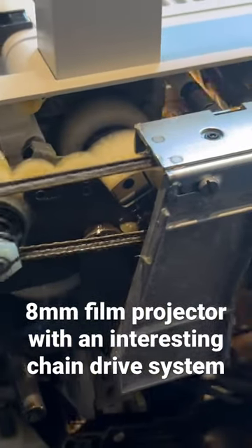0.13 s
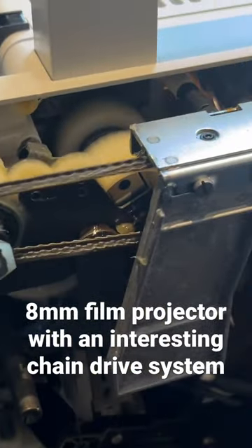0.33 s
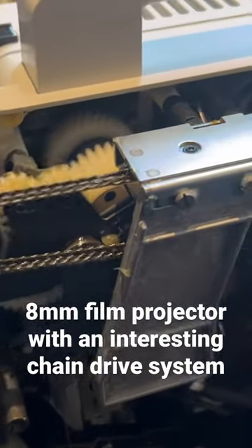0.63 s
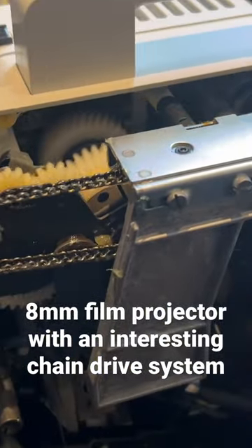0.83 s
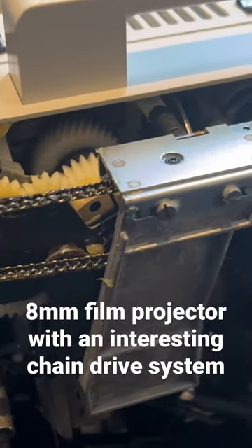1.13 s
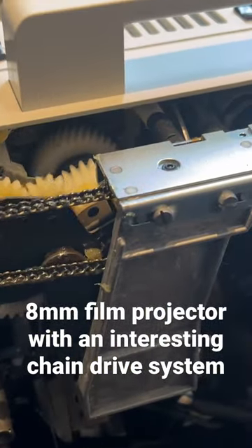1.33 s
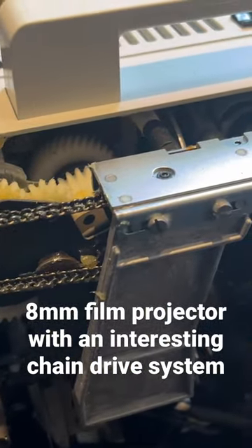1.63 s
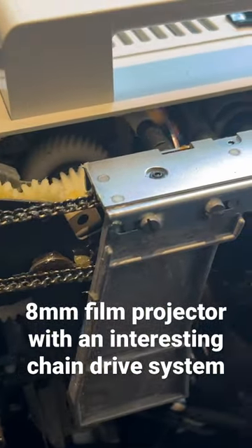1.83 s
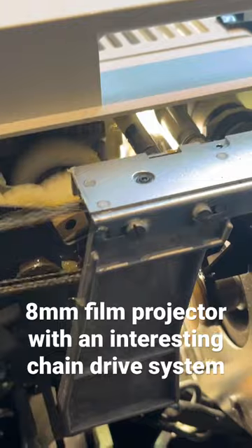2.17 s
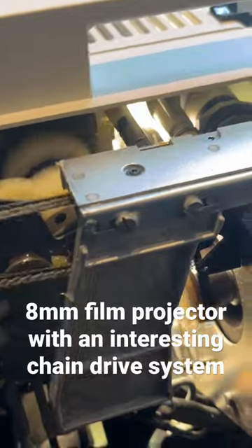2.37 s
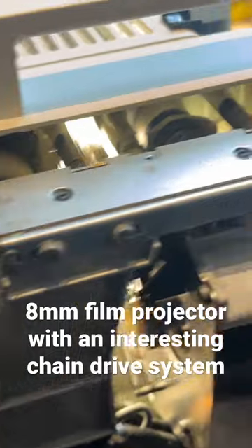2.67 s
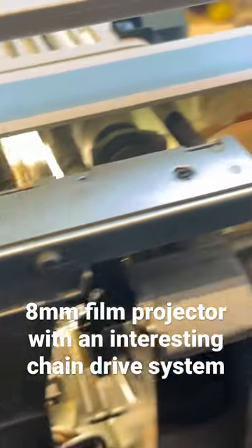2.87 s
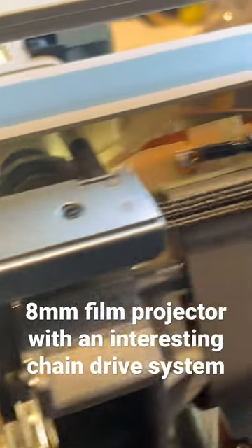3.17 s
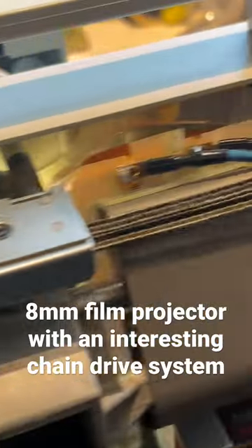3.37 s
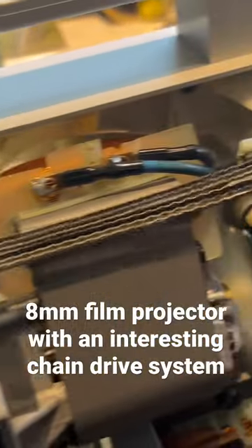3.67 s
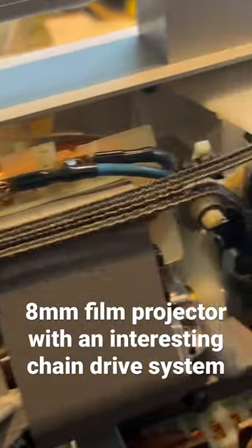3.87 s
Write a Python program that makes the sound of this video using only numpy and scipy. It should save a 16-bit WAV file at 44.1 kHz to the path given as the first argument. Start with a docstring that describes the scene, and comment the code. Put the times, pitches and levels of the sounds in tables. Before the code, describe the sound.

Close stereo microphone on a projector's chain drive indoors: brief fast whir, loud clack, slowing ticks, quiet pause with two duller clacks, then a crisp switch snap and steady whirring chatter to the end.

```python
"""A quiet room, heard close to a small film projector: its motor is switched off and coasts down,
a lever is clacked through its stops, and the motor starts again.
Sines locked to the shaft or the mains give frame shake, gear whine and hum; random impulses and
noise give the whir and chatter of the chain drive. The claw's strokes ring a spring plate, and
bursts of noise crack and ring the casing. Faint room air and a short reverberation surround it."""
import sys
import numpy as np
from scipy import signal
from scipy.fft import rfft, irfft
from scipy.io import wavfile

SR = 44100
rng = np.random.default_rng(int(sys.argv[2]) if len(sys.argv) > 2 else 0)


def transcribe(signal):
    """Save signal, clipped to [-1, 1], as a 16-bit WAV file at the path in sys.argv[1]."""
    frames = np.atleast_2d(signal).T
    limited = np.clip(frames, -1, 1)
    pcm = np.round(limited * 32767).astype(np.int16)
    wavfile.write(sys.argv[1], SR, pcm)


N = 176400
T = np.arange(N) / SR  # time in s

CAM_HZ = 17.72  # cam turns per second at full speed
# Spectrum of a hard contact. Each row: frequency in Hz, gain in dB.
CRACK_TONE = [(300, -8.5), (1500, 11.5), (3300, 7), (6300, 5.5), (11500, 2), (16000, -10.5)]


def amp(db):
    """Decibels are a logarithmic measure of amplitude: 20 dB is a factor of ten."""
    return 10 ** (np.asarray(db) / 20)


def evened(x):
    """Root-mean-square normalization gives a signal unit mean power."""
    return x / np.sqrt(np.mean(x ** 2) + 1e-20)


def read(points, hz):
    """Interpolation along a logarithmic frequency axis follows musical intervals."""
    f, value = np.transpose(points)
    return np.interp(np.log(hz + 1), np.log(f + 1), value)


def curve(points):
    """An envelope is a piecewise linear function of time."""
    return np.interp(T, *np.transpose(points))


def add(mix, s, sound):
    """Superposition: a sound is summed into the mix from time s, cut at the mix's ends."""
    i = round(s * SR)
    part = mix[max(i, 0):][:len(sound) + min(i, 0)]
    part += sound[max(-i, 0):][:len(part)]


def colour(x, points):
    """A minimum-phase filter: the Hilbert transform of log gain gives the phase of a causal response."""
    log_gain = read(points, np.fft.rfftfreq(8192, 1 / SR)) * np.log(10) / 20
    mirrored = np.r_[log_gain, log_gain[-2:0:-1]]
    response = np.exp(signal.hilbert(mirrored).conj())
    taps = np.fft.ifft(response).real[:4096]
    return signal.fftconvolve(x, taps)[:len(x)]


def slow(top_hz):
    """Sines of random phase, weaker towards high rates, sum to a slow fluctuation of rms 1."""
    rates = np.geomspace(top_hz / 20, top_hz, 16)
    phases = rng.random(16)
    coarse_t = T[::64]
    waves = np.sin(2 * np.pi * (rates * coarse_t[:, None] + phases)) / np.sqrt(rates)
    return np.interp(T, coarse_t, evened(waves.sum(1)))


def air():
    """Room air is broadband noise, partly coherent between the two channels."""
    # Each row: frequency in Hz, spectral level in dB per Hz.
    air_tone = [(60, 1), (2400, -12.5), (5000, -21.5), (16000, -65.5)]
    level_db = -59
    shared, left, right = rng.standard_normal((3, N))
    pair = [colour(shared + .5 * own, air_tone) for own in (left, right)]
    return amp(level_db) * evened(np.array(pair))


def tones(turns, speed):
    """Forced vibration: frame shake and gear whine follow the shaft, hum follows the mains."""
    # Frame shake. Each row: multiple of the cam rate, level at full speed in dB rms.
    orders = [(3, -53.5), (7, -52), (8, -47), (9, -53), (26, -59), (30, -55.5)]
    # Hum. Each row: multiple of the mains hum, steady level at full speed in dB rms.
    hum_lines = [(1, -48), (2, -49.5), (3, -53.5)]
    mains_hz, gear_hz = 100., 771.4  # gear whine at full speed
    gear_db, waver_db = -49, 1.5  # gear at full speed; rms waver of every line
    speed_power = 5.8  # amplitude of shake and whine against speed
    off_s, on_s, ramp_s = .236, 1.803, 0.03
    start_db, start_s = 4.5, 0.14  # surge of the first hum line about the start

    def line(cycles, db):
        wavering = amp(db + waver_db * slow(25))
        return np.sqrt(2) * wavering * np.sin(2 * np.pi * (cycles + rng.random()))

    driven = sum(line(k * turns, db) for k, db in orders)
    driven += line(turns * gear_hz / CAM_HZ, gear_db)
    before_off = np.clip((off_s - T) / ramp_s, 0, 1)
    after_on = np.clip((T - on_s) / ramp_s, 0, 1)
    strain = amp(start_db * np.exp(-abs(T - on_s) / start_s))
    hum = line(mains_hz * T, hum_lines[0][1]) * strain
    hum += speed * sum(line(k * mains_hz * T, db) for k, db in hum_lines[1:])
    return driven * speed ** speed_power + (before_off + after_on) * hum


def whir(turns):
    """Random impulses of the links add in power to air and bearing hiss, swelling once per cam turn."""
    # Each row: time in seconds, level in dB.
    whir_level = [(.2, -38), (.4, -46.5), (.7, -62.5), (1.79, -100), (1.84, -48.5), (1.92, -47.5),
                  (1.97, -41), (4, -40)]
    # Each row: frequency in Hz, spectral level in dB per Hz.
    whir_tone = [(45, -8.5), (140, -4), (400, -9), (1600, -15), (2450, -14.5), (4300, -22), (8000, -26),
                 (11500, -29), (16000, -43.5)]
    # Each row: frequency in Hz, amplitude share that each channel has to itself.
    stray_share = [(100, 0.36), (1500, 0.84), (8000, 0.023)]
    links_per_s, spread_db = 1300, 3.5  # spread: mean of the random excess level before its limit
    link_share, swing_db = 0.38, 1.5  # power share of links; swing either way

    sizes = amp(spread_db * np.minimum(rng.exponential(1, N), 5))
    links = (rng.random(N) < links_per_s / SR) * rng.choice([-1, 1], N) * sizes
    hiss = rng.standard_normal(N)
    drive = np.sqrt(link_share) * evened(links) + np.sqrt(1 - link_share) * hiss
    drive *= amp(swing_db * np.cos(2 * np.pi * turns))

    stray = rng.standard_normal((2, N))
    share = read(stray_share, np.fft.rfftfreq(N, 1 / SR))
    pair = irfft(np.sqrt(1 - share ** 2) * rfft(drive) + share * rfft(stray), N)
    pair = np.array([colour(channel, whir_tone) for channel in pair])
    return evened(pair) * amp(curve(whir_level))


def chatter(turns):
    """Impact excitation: links knock on sprockets, bunched by the cam.

    Each knock rings one part drawn at random for each channel, so often two together."""
    # Each row: ring frequency in Hz, level in dB, t60 in seconds,
    # time in seconds at which the microphone is nearest.
    sprocket = [(1147, -2.5, 0.023, 2.45), (1875, -3.5, 0.023, 3.06), (2310, -5.5, .02, 2.3),
                (2564, -1, .02, 3.7)]
    # Each row: time in seconds, level in dB.
    chatter_level = [(.25, -39.5), (.85, -90.5), (1.88, -88.5), (1.97, -46.5), (4, -49.5)]
    # Each row: times per cam turn, depth of the modulation.
    swings = [(1, 0.37), (3, 0.32)]
    near_db, near_s = 6, 0.38  # rise at the nearest moment and its time scale
    knocks_per_s, spread_db = 800, 4.  # spread: mean of the random excess level before its limit

    bunch = 1
    for k, depth in swings:
        bunch = bunch * (1 + depth * np.cos(2 * np.pi * k * turns))
    sizes = amp(spread_db * np.minimum(rng.exponential(1, N), 3))
    knocks = (rng.random(N) < knocks_per_s / SR) * bunch * sizes
    parts = rng.integers(0, len(sprocket), (2, N))  # drawn apart for each channel
    t, out = T[:2500], np.zeros((2, N))
    for k, (hz, db, t60, nearest_s) in enumerate(sprocket):
        ring = amp(db - 60 * t / t60) * np.sin(2 * np.pi * hz * t)
        near = amp(near_db * np.exp(-((T - nearest_s) / near_s) ** 2))
        out += [signal.oaconvolve(knocks * near * (p == k), ring)[:N] for p in parts]
    crossed = out + .5 * out[::-1]  # each channel also hears the other
    return evened(crossed) * amp(curve(chatter_level))


def claw(speed):
    """A damped resonator: each stroke pings a spring plate, ticks, and pings it again on the return."""
    # One stroke per cam turn. Each row: start in seconds, peak of the first ping in dB.
    strokes = [(-.0095, -29), (0.0457, -29.5), (0.103, -29.5), (0.16, -28), (.215, -28), (0.271, -32.5),
               (0.338, -33), (.417, -36.5), (0.513, -41.5)]
    plate_hz, t60, full_rise_s = 1059, 0.0093, 0.004  # rise at full speed
    tick_turn, tick_db, tick_s = .17, 3, 0.0025  # delay in turns; level before colouring, re first ping
    back_turn, back_db = 0.24, -20.5  # delay in turns; peak re first ping

    out, t = np.zeros(N), T[:4000]
    tone = np.sin(2 * np.pi * plate_hz * t)
    ring = amp(-60 * t / t60) * tone
    for s, db in strokes:
        turn_s = 1 / CAM_HZ / speed[max(round(s * SR), 0)]
        rise_s = full_rise_s * np.sqrt(turn_s * CAM_HZ)  # slower strokes push longer
        push = t / rise_s * np.exp(-t / rise_s)
        push_noise, back_noise, tick_noise = rng.standard_normal((3, len(t)))
        for delay, gain_db, noise in ((0, 0, push_noise), (back_turn, back_db, back_noise)):
            ping = signal.fftconvolve(ring, push * (tone + 1.62 * noise))[:len(t)]
            add(out, s + delay * turn_s, amp(db + gain_db) * ping / abs(ping).max())
        burst = tick_noise * np.sqrt(t / tick_s) * np.exp(-t / tick_s)
        add(out, s + tick_turn * turn_s, amp(db + tick_db) * colour(burst, CRACK_TONE))
    return out


def tiny_ticks():
    """A very short decaying noise burst has a broad spectrum and is heard as a tick."""
    # Each row: start in seconds, level before colouring in dB.
    ticks = [(0.033, -39), (0.073, -40.5), (0.1008, -34), (.142, -34), (.2245, -32), (0.3232, -37.5),
             (.474, -50), (.609, -53.5), (.953, -58.5), (1.612, -54), (1.702, -57.5), (1.772, -50),
             (1.967, -43)]
    # Each row: frequency in Hz, gain in dB.
    tick_tone = [(1500, -10), (5000, 2.5)]
    decay_s = 0.0017
    out, t = np.zeros(N), T[:1000]
    for s, db in ticks:
        burst = rng.standard_normal(len(t)) * np.exp(-t / decay_s)
        add(out, s, amp(db) * colour(colour(burst, CRACK_TONE), tick_tone))
    return out


def clack(s, db, length, thud_db, body_db, ring_db):
    """Modal excitation: an uneven rattle of contacts cracks and rings the casing; loose parts buzz after."""
    # Corner frequencies in Hz of the thud, body (two), ring and top zones.
    zones_hz = [140, 330, 1300, 2400, 5500]
    # Casing modes. Each row: nominal frequency in Hz, level in dB, t60 in seconds.
    case_modes = [(137.5, -2.7, 0.18), (321, -7, 0.055), (453, -9.5, 0.056), (763, -4.5, 0.038),
                  (1088, 1, 0.039), (1120, -27.5, 0.68), (1330, -24, 0.496), (1548, -9.5, 0.12),
                  (2408, 6, 0.023), (4273, -3, .02)]
    crack_db, case_db = -2.5, -3.5
    lead_s, rise_s, bounce_s = .008, 0.00083, .002  # lead: room for the rise before the contact
    buzz_db, buzz_s = -16.5, 0.024
    detune, mode_rise_turns = 0.015, 0.68  # detune: share of frequency; rise in cycles of the mode

    t = T[:14000]
    zones = list(zip(zones_hz, (thud_db, body_db, body_db, ring_db, 0)))
    noise = rng.standard_normal((len(case_modes) + 1, len(t)))
    rise = np.exp(np.minimum(t - lead_s, 0) / rise_s)
    rattle = rise * np.exp(-np.maximum(t - lead_s, 0) / length)
    # after the first contact, each bounce has a chance strength
    bounces = np.sqrt(rng.exponential(1, len(t)))[(t / bounce_s).astype(int)]
    rattle = rattle * np.where(t < lead_s + bounce_s, 1, bounces)
    buzz = rise * amp(buzz_db) * np.exp(-t / buzz_s)
    crack = noise[-1] * (rattle + buzz)
    out = amp(crack_db) * colour(colour(crack, CRACK_TONE), zones)

    offsets = rng.uniform(-1.1, 1, len(case_modes))
    for (hz, mode_db, t60), n, off in zip(case_modes, noise, offsets):
        envelope = (1 - np.exp(-t * hz / mode_rise_turns)) * amp(-60 * t / t60)
        ring = envelope * np.sin(2 * np.pi * hz * (1 + detune * off) * t)
        rung = signal.fftconvolve(ring, n * rattle)[:len(t)]
        out += amp(case_db + mode_db + read(zones, hz)) * rung / abs(rung).max()
    return s - lead_s, amp(db) * out


def room(x):
    """Reverberation as sparse reflections of random sign, each band decaying at its own rate."""
    # Each row: frequency in Hz, t60 in seconds.
    room_t60 = [(150, .35), (14000, .14)]
    taps = np.zeros((2, SR // 2))
    at = np.arange(160, SR // 2 - 20, 20)
    at = at + rng.integers(0, 20, (2, len(at)))
    np.put_along_axis(taps, at, rng.choice([-1., 1.], at.shape), 1)
    taps[1] = taps[0] + 0.92 * taps[1]  # the channels are partly coherent
    hz, t, bands = signal.stft(taps, SR, nperseg=256)
    decay = amp(-60 * t / read(room_t60, hz)[:, None])
    tail = signal.istft(bands * decay, SR, nperseg=256)[1]
    tail = tail / np.linalg.norm(tail[0])
    return signal.fftconvolve(x[None], tail, axes=1)[:, :N]


def scene():
    """Superposition of all sources, the drive's parts sharing one shaft angle."""
    # Each row: time in seconds, speed as a share of full.
    speed_points = [(.25, 1), (.36, .72), (.52, .4), (.85, .02), (1.83, .02), (1.945, .86), (1.985, 1)]
    # Lever and switch clacks. Each row: contact time in seconds, level in dB,
    # rattle decay time in seconds, thud gain in dB, body gain in dB, ring gain in dB.
    clacks = [(0.2314, -13, 0.0049, -13, -15, -52), (0.2351, -11, 0.00046, -18, -13, -7),
              (0.7341, -22.5, 0.014, -14, 1, -1.5), (1.2864, -40.5, 0.0029, -6.5, 0.5, -7),
              (1.3409, -22.5, 0.002, 0, -5.5, 0.5), (1.786, -27.5, 0.0038, -13, -17.5, -16.5),
              (1.8047, -15.5, 0.0009, -13.5, -32.5, -1), (1.8074, -28, 0.0061, -11, 2.5, -4)]
    waver = 0.001  # rms share of speed
    cam_peak_s = 3.078  # a moment at which the cam loads the chain most
    room_db = -19

    speed = curve(speed_points)
    turns = np.cumsum(CAM_HZ * speed * (1 + waver * slow(5.06))) / SR
    turns = turns - np.interp(cam_peak_s, T, turns)
    hits = claw(speed) + tiny_ticks()
    for row in clacks:
        add(hits, *clack(*row))
    drive = tones(turns, speed) + whir(turns) + chatter(turns)
    return air() + drive + hits + amp(room_db) * room(hits)


def record(dry):
    """Two close microphone ports differ in phase and balance with frequency; then the band is limited."""
    # Each row: frequency in Hz, phase in radians by which the left leads.
    port_turn = [(0, 0), (2000, .9), (4700, .5), (7670, -2.9), (9560, -3.6), (11500, -6.2), (14600, -8.5)]
    # Each row: frequency in Hz, left minus right level in dB.
    port_tilt = [(300, 0), (1300, -2), (4400, 3.5), (8000, 0)]
    low_cut_hz, edge_hz = 40, 16400
    padded = N + 4096
    hz = np.fft.rfftfreq(padded, 1 / SR)
    phase = np.interp(hz, *np.transpose(port_turn))
    half = amp(read(port_tilt, hz) / 2) * np.exp(.5j * phase)  # half the difference to each side
    ports = irfft(rfft(dry, padded) * [half, 1 / half], padded)[:, :N]
    low_cut = signal.butter(4, low_cut_hz, 'high', fs=SR, output='sos')
    ports = signal.sosfilt(low_cut, ports)
    band = signal.firwin(511, edge_hz, window=("kaiser", 9), fs=SR)
    return signal.oaconvolve(ports, band[None], "same")


dry = scene()
out = record(dry)
transcribe(out)
```